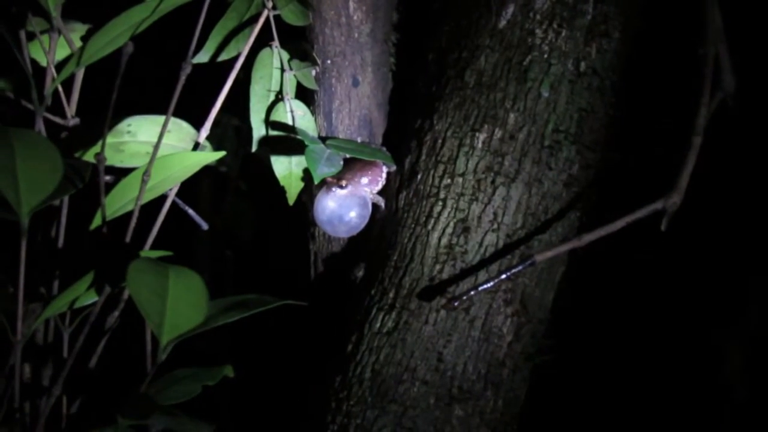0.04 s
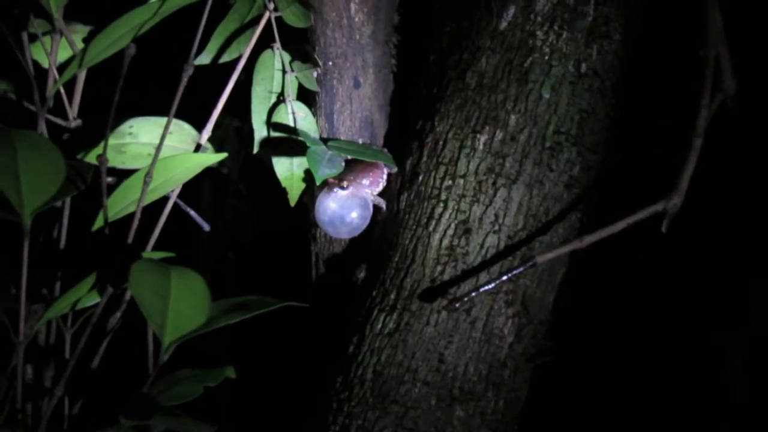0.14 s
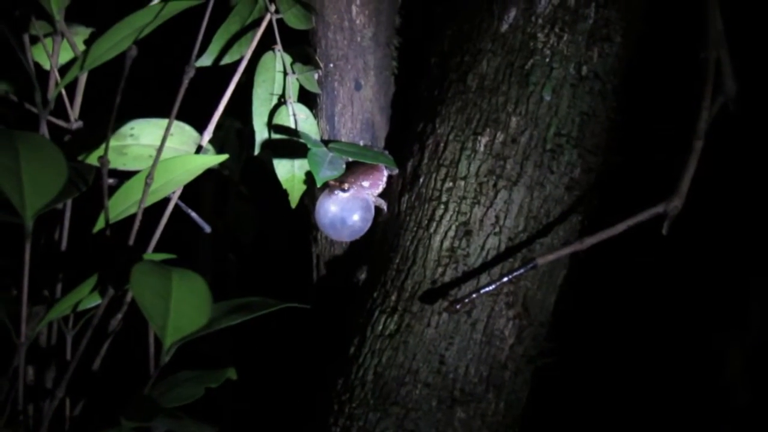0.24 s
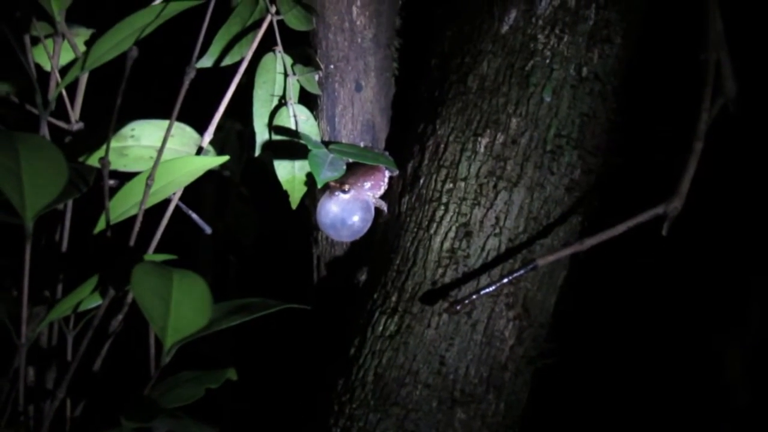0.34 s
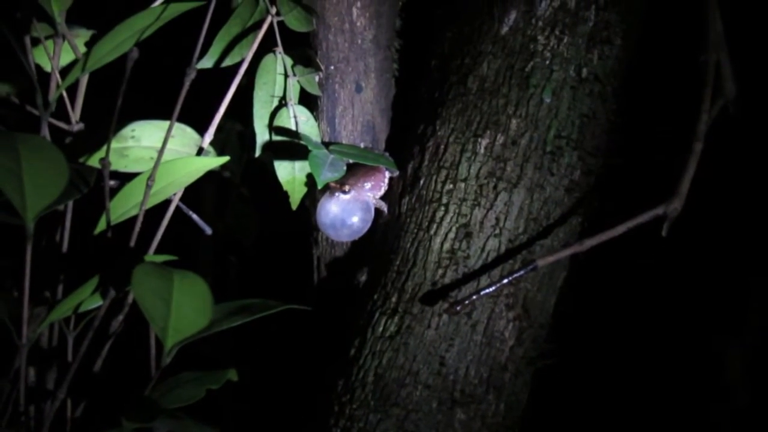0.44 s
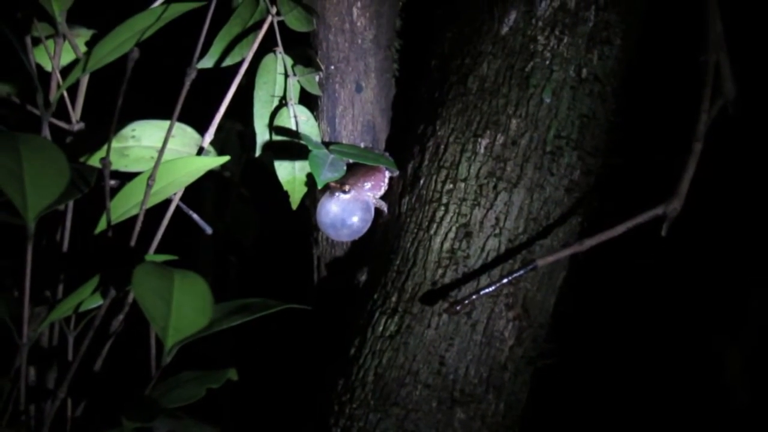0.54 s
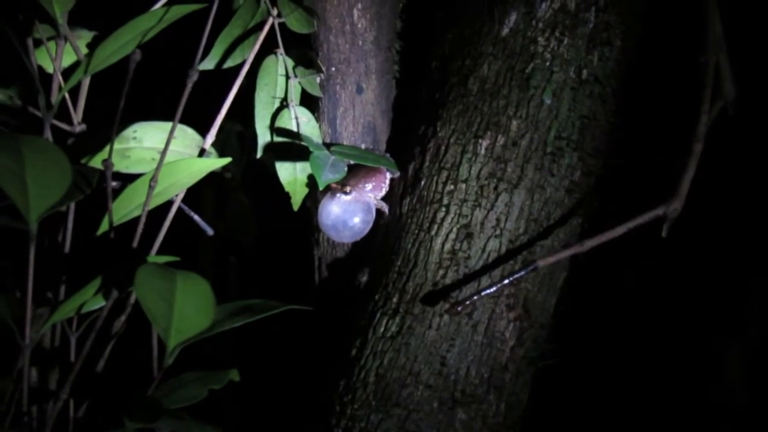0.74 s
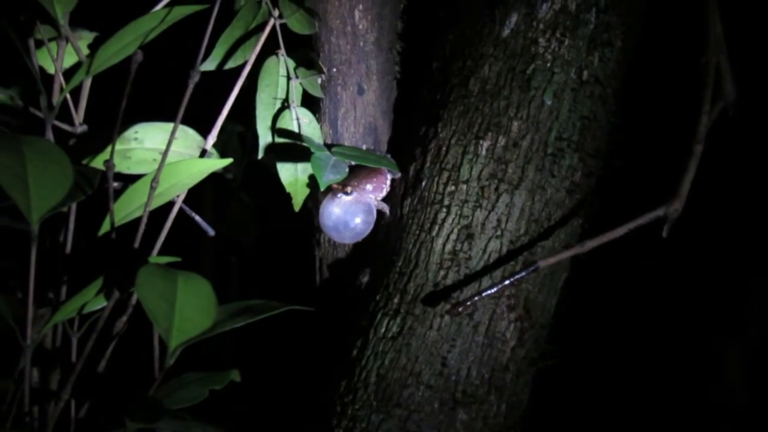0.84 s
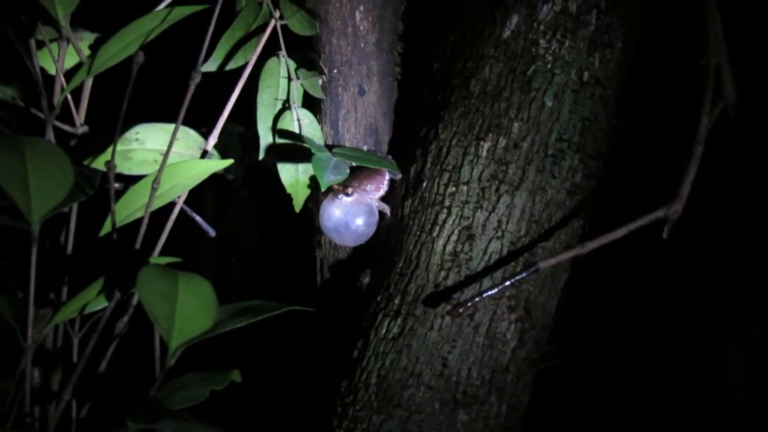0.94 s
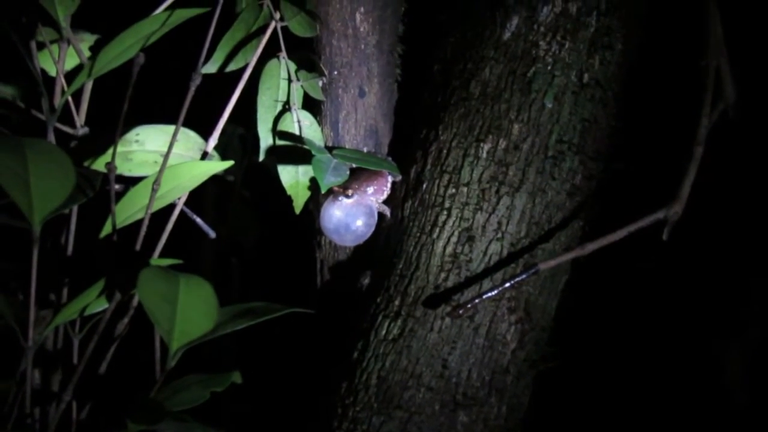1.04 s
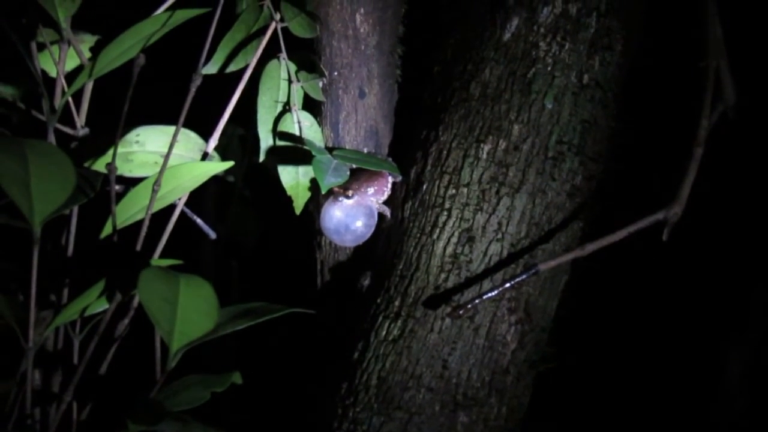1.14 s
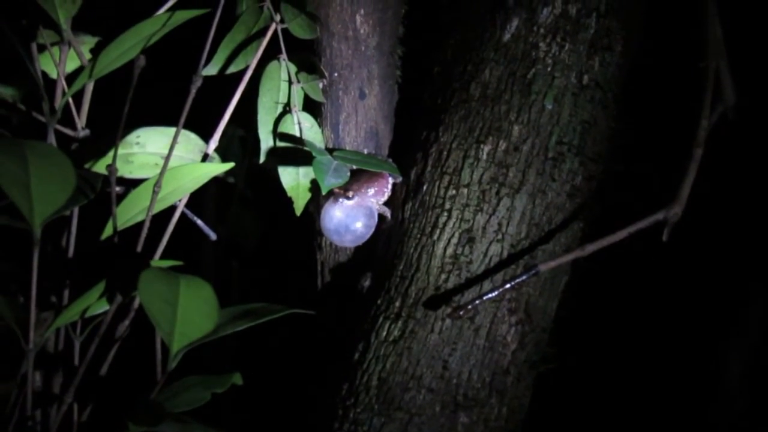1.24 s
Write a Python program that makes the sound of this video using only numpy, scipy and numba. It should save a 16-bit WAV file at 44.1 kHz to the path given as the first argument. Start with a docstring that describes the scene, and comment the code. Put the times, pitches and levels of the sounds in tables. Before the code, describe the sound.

Two sharp, high frog clicks nearby, with distant frogs and faint insects behind.

```python
"""Night forest. From the start: low hum, faint air, fluttering insects, a far frog chorus.
Neighbouring frogs click in the trees throughout; lower pips join at 0.14 s.
At 0.21 s a bush frog on a trunk clicks close to the microphone, its vocal sac ringing near 2.9 kHz.
The recorder overloads; its gain control ducks the forest and slowly lets it back.
A faint low note passes at 0.68 s. At 0.96 s the near frog clicks again and the forest ducks again."""
import sys
import numpy as np
from scipy import signal
from scipy.fft import rfft, irfft
from scipy.io import wavfile
from scipy.ndimage import uniform_filter1d
from numba import njit

SR = 44100
rng = np.random.default_rng(int(sys.argv[2]) if len(sys.argv) > 2 else 0)


def store_pcm(level_fs):
    """Save levels as 16-bit WAV."""
    pcm = np.round(np.clip(level_fs, -1, 1) * 32767).astype(np.int16)
    wavfile.write(sys.argv[1], SR, np.atleast_2d(pcm).T)


N = 57330

# hum tones: pitch_hz, level_db
HUM_TONES = [(73, -68), (101, -81)]
# hum envelope: time_s, relative_db
HUM_ENVELOPE = [(0, -2), (.1, -3.5), (.19, 3), (.3, -5), (.46, -1.5), (.57, -12), (.72, -0.5), (.94, -5.5),
                (1.03, -1.5), (1.3, 3.5)]
# night air spectrum: freq_hz, relative_db
AIR_SPECTRUM = [(25, -8.5), (60, -4.5), (160, -2), (280, -8), (500, -5), (1000, -10.5), (2000, -5),
                (3300, -3.5), (4200, -12.5), (7000, -11.5), (9000, -19), (15000, -20)]
# insect bands: centre_hz, width_hz, level_db, flutter_db
INSECT_BANDS = [(4790, 130, -69.5, -0.5), (5263, 180, -63.5, 3.5), (6090, 550, -62.5, -3.5),
                (6367, 280, -58, 1.5)]
# passband of distant calls: low_hz, high_hz
FAR_BAND_HZ = [1600, 3870]
# neighbouring frogs' clicks: start_s, pitch_hz, level_db, left_over_right_db, wet_db
NEIGHBOUR_CLICKS = [(0.0128, 2800, -36.5, -11, 14.5), (0.058, 2860, -32.5, 12, 10.5),
                    (0.0678, 2730, -33, 14, 1), (0.1420, 2856, -25, -17.5, -7.5),
                    (0.1570, 2780, -35, -24, -10), (0.2025, 2810, -23, -8.5, -9),
                    (0.3590, 2746, -31, -11, -7), (0.4009, 3000, -30.5, -24, -4),
                    (0.42, 3045, -24, -18, 10.5), (0.5253, 3000, -18, 15.5, 8), (0.6262, 3217, -28, 5.5, 8),
                    (0.7389, 2885, -23.5, -1.5, 11), (0.7564, 2920, -31.5, -33, 4),
                    (0.7940, 3120, -30, -23, 9), (0.9255, 2875, -28.5, 19, -20),
                    (1.0617, 3010, -21.5, -15, 8.5), (1.2497, 2995, -18.5, 15.5, 11),
                    (1.2803, 2705, -32.5, -10, 21)]
# other frogs' pips: start_s, pitch_hz, level_db, left_over_right_db
NEIGHBOUR_PIPS = [(0.1408, 2420, -29, -15), (0.517, 2560, -19.5, 8), (0.6930, 2527, -21, 5),
                  (0.8777, 2600, -21, 15)]
# near frog's clicks: start_s, level_db
NEAR_CLICKS = [(0.2097, 12.5), (0.96386, 11.5)]
# echoes off trunk and leaves: delay_s, left_db, right_db
TREE_ECHOES = [(.00110, -51.5, -2), (.00307, -14.5, -21), (.00921, -18.5, -53), (0.0115, -18, -39),
               (0.0146, -33, -37)]
# distant note: peak_s, length_s, pitch_hz, level_db
LOW_NOTE = (.68, .08, 475, -64)

SAC_HZ, SAC_T60_S = 2932, 0.017
SCOOP_HZ, SCOOP_S = 286, 0.00035
SCATTER_PER_S = 1300


def undb(db):
    """Decibels to gain."""
    return 10 ** (np.asarray(db) / 20)


def at_rms(x, db):
    """Scale to an rms level."""
    return x * undb(db) / np.sqrt(np.mean(x ** 2))


def wander(rate_hz):
    """Smooth random drift, spread near 1."""
    hold = int(SR / rate_hz)
    steps = np.repeat(rng.standard_normal(N // hold + 1), hold)
    return 1.3 * uniform_filter1d(uniform_filter1d(steps, hold), hold)[:N]


def noise(gain_at):
    """Independent left and right noise, shaped by gain_at(hz)."""
    hz = np.maximum(np.arange(N // 2 + 1) * SR / N, 1)
    return irfft(rfft(rng.standard_normal((2, N))) * gain_at(hz), N)


def hum():
    """Two low tones wavering in level and phase."""
    t = np.arange(N) / SR
    swell = undb(np.interp(t, *np.array(HUM_ENVELOPE).T))
    return sum(at_rms(swell * np.sin(2 * np.pi * hz * t + .3 * wander(rate_hz=6.9)), db)
               for hz, db in HUM_TONES)


def night_air(level_db=-59.5):
    """Faint, steady broadband noise."""
    freq_hz, relative_db = np.array(AIR_SPECTRUM).T
    air = noise(lambda hz: undb(np.interp(np.log(hz), np.log(freq_hz), relative_db)))
    return at_rms(air, level_db)


def insects(flutter_hz=220):
    """Narrow shrill bands, each fluttering independently."""
    out = np.zeros((2, N))
    for centre_hz, width_hz, db, flutter_db in INSECT_BANDS:
        band = noise(lambda hz: 1 / np.sqrt(1 + ((hz - centre_hz) / (width_hz / 2)) ** 4))
        out += at_rms(band * undb(flutter_db * wander(flutter_hz)), db)
    return out


def sac_ring(start_s, pitch_hz, t60_s, swell_s=0.00073):
    """A vocal sac swells, scoops up to pitch within a few cycles, then rings down."""
    first = int(np.clip(start_s * SR, 0, N))
    span = np.arange(first, min(first + int(2 * t60_s * SR), N))
    age_s = np.maximum(span / SR - start_s, 0)
    cycles = pitch_hz * age_s - SCOOP_HZ * SCOOP_S * (1 - np.exp(-age_s / SCOOP_S))
    swell = 1 - np.exp(-(age_s / swell_s) ** 2)
    decay = undb(-60 * age_s / t60_s)
    out = np.zeros(N)
    out[span] = -swell * decay * np.sin(2 * np.pi * cycles)
    return out


def distant(x):
    """Only a call's main band carries over distance."""
    return signal.sosfilt(signal.butter(2, FAR_BAND_HZ, "bandpass", fs=SR, output="sos"), x)


def far_chorus(pitch_hz=2947, spread_hz=139, clicks_per_s=590, level_db=-44):
    """Many far frogs; their clicks blur into a flickering band."""
    out = np.zeros((2, N))
    count = int(clicks_per_s * N / SR)
    for side in out:
        starts_s = (np.arange(count) + rng.random(count)) / clicks_per_s
        pitches_hz = pitch_hz + spread_hz * rng.standard_normal(count)
        for start_s, hz in zip(starts_s, pitches_hz):
            side += sac_ring(start_s, hz, t60_s=.03)
    return at_rms(distant(out), level_db)


def forest_tail(x, wet_db, t60_s, gap_s):
    """Echoes scattered by trunks and foliage, different on each side."""
    t = np.arange(N // 2) / SR
    hits = rng.random((2, len(t))) < SCATTER_PER_S / SR
    decay = undb(-60 * t / t60_s) * (t > gap_s)
    response = hits * rng.standard_normal(hits.shape) * decay
    wet = signal.fftconvolve(x[None], response, axes=1)
    to_dry_level = np.sqrt(np.sum(x ** 2) / np.sum(wet ** 2, axis=1, keepdims=True))
    return undb(wet_db) * to_dry_level * wet[:, :N]


def among_trees(x, pan_db, wet_db):
    """A call some metres off: panned, trailed by the forest, band-limited."""
    direct = x * undb([[pan_db / 2], [-pan_db / 2]])
    return distant(direct + forest_tail(x, wet_db, t60_s=.3, gap_s=.003))


def neighbour_clicks(t60_s=0.014):
    """Short, sharp sac rings from the trees."""
    return sum(undb(db) * among_trees(sac_ring(start_s, hz, t60_s), pan_db, wet_db)
               for start_s, hz, db, pan_db, wet_db in NEIGHBOUR_CLICKS)


def neighbour_pips(t60_s=0.018, swell_s=0.0015, wet_db=-1.5):
    """Lower sac rings, rounded by a slower swell."""
    return sum(undb(db) * among_trees(sac_ring(start_s, hz, t60_s, swell_s), pan_db, wet_db)
               for start_s, hz, db, pan_db in NEIGHBOUR_PIPS)


def near_click(start_s, octave_db=-40.5):
    """The sac's main ring plus its faint octave."""
    octave = undb(octave_db) * sac_ring(start_s, 2 * SAC_HZ, t60_s=.018)
    return sac_ring(start_s, SAC_HZ, SAC_T60_S) + octave


def near_frog(right_db=2.04):
    """Two loud clicks with trunk and leaf echoes and a faint forest tail."""
    out = np.zeros((2, N))
    for start_s, db in NEAR_CLICKS:
        direct = near_click(start_s)
        call = np.array([direct, undb(right_db) * direct])
        for delay_s, echo_left_db, echo_right_db in TREE_ECHOES:
            call += undb([[echo_left_db], [echo_right_db]]) * near_click(start_s + delay_s)
        call += forest_tail(direct, wet_db=-22.5, t60_s=0.27, gap_s=0.017)
        out += undb(db) * call
    return out


def low_note():
    """One soft distant tone that swells and fades."""
    peak_s, length_s, hz, db = LOW_NOTE
    t = np.arange(N) / SR - peak_s
    swell = np.exp(-(2 * t / length_s) ** 2)
    return undb(db) * swell * np.sin(2 * np.pi * hz * t)


def overload(x, ceiling=1.67, hardness=18, asymmetry=0.0024):
    """The input stage saturates, positive peaks slightly earlier."""
    limit = ceiling * (1 - asymmetry * np.sign(x))
    return x / (1 + np.abs(x / limit) ** hardness) ** (1 / hardness)


@njit
def gain_control_db(wanted_db, attack_s, hold_s, recover_db_per_s):
    """Gain drops fast on a peak, holds, then climbs steadily back to 0 dB."""
    out = np.empty(len(wanted_db))
    gain_db, calm_samples = 0., 0
    for i in range(len(wanted_db)):
        calm_samples += 1
        if wanted_db[i] < gain_db:
            gain_db += (wanted_db[i] - gain_db) / (attack_s * SR)
            calm_samples = 0
        elif calm_samples > hold_s * SR:
            gain_db = min(gain_db + recover_db_per_s / SR, 0.)
        out[i] = gain_db
    return out


def scene():
    """Frogs, near to far, over the night forest's background."""
    frogs = near_frog() + neighbour_clicks() + neighbour_pips() + far_chorus()
    return frogs + insects() + hum() + night_air() + low_note()


def record(dry):
    """Overload, per-channel gain control, clipping, low-pass."""
    threshold_db, cutoff_hz = -6.5, 15800
    hot = overload(dry)
    wanted_db = np.minimum(threshold_db - 20 * np.log10(np.abs(hot) + 1e-9), 0)
    gain_db = [gain_control_db(side, attack_s=0.00046, hold_s=.22, recover_db_per_s=21.5)
               for side in wanted_db]
    clipped = np.clip(hot * undb(gain_db), -.98, .98)
    return signal.sosfilt(signal.ellip(8, .2, 70, cutoff_hz, fs=SR, output="sos"), clipped)


dry = scene()
out = record(dry)
store_pcm(out)
```